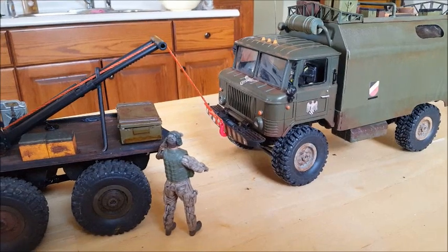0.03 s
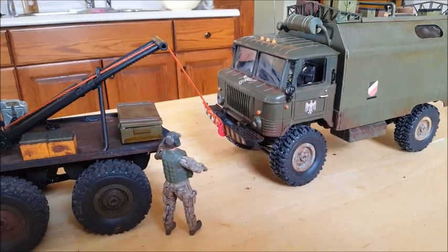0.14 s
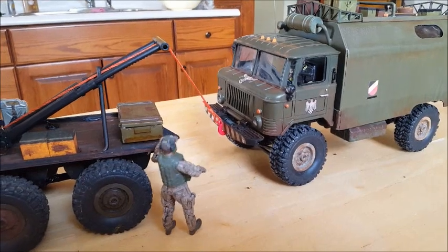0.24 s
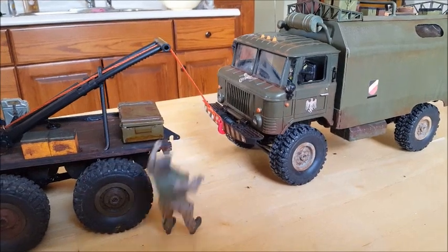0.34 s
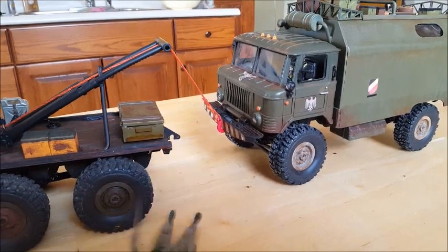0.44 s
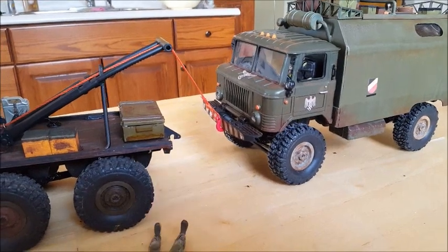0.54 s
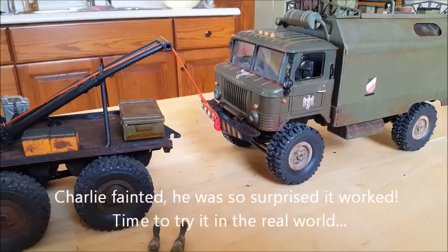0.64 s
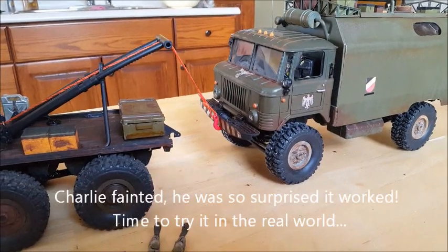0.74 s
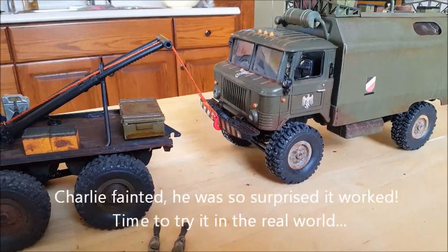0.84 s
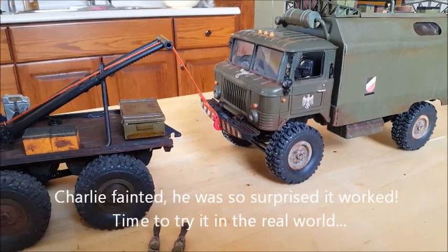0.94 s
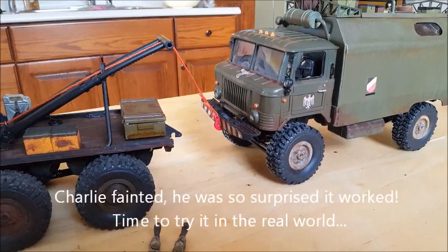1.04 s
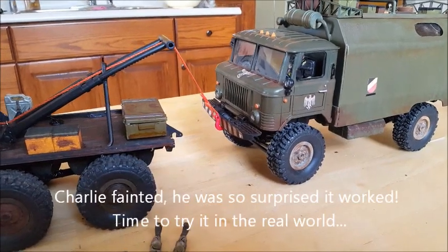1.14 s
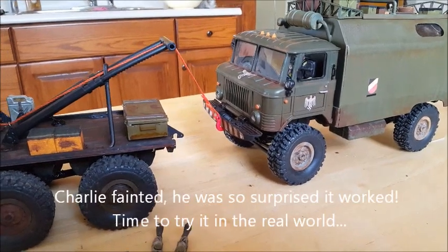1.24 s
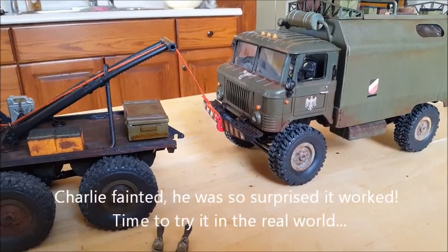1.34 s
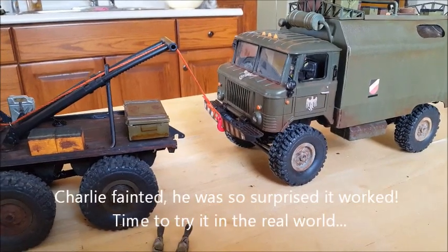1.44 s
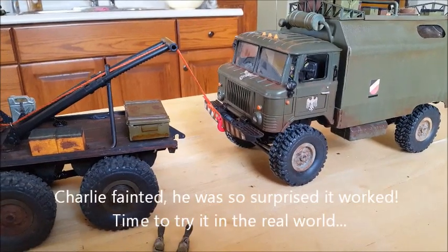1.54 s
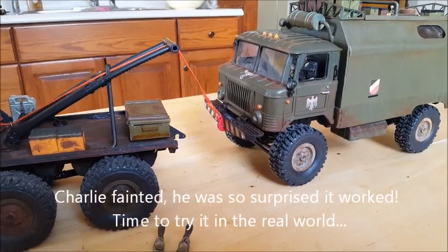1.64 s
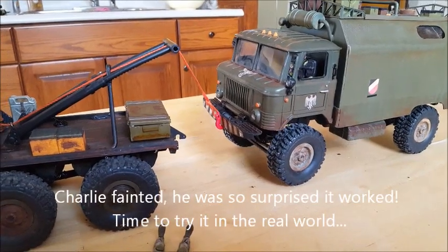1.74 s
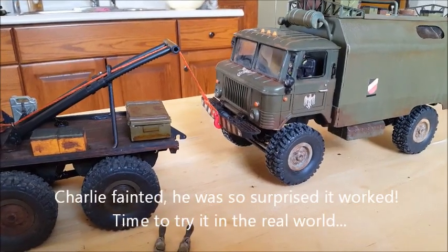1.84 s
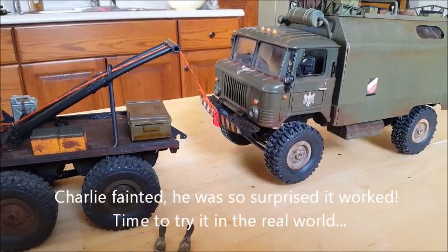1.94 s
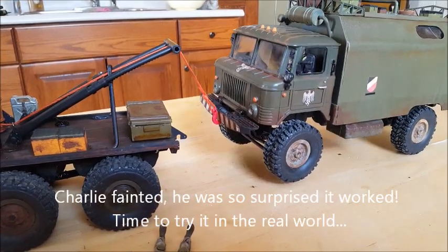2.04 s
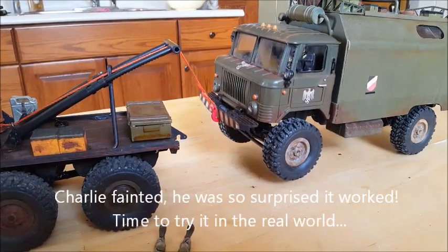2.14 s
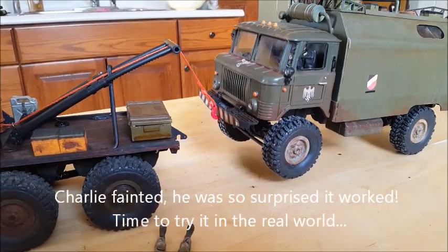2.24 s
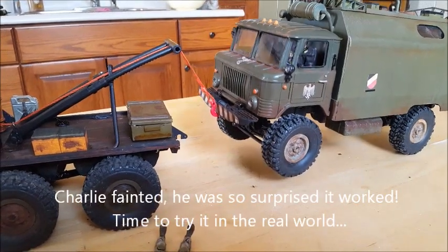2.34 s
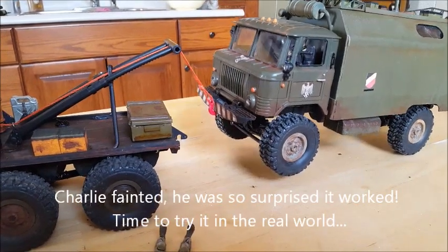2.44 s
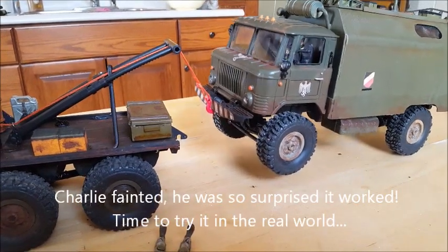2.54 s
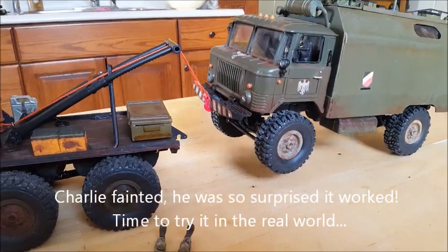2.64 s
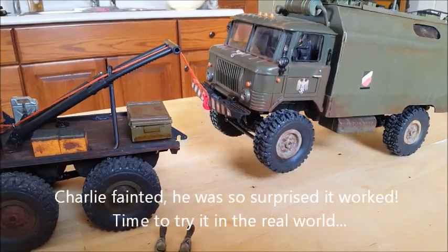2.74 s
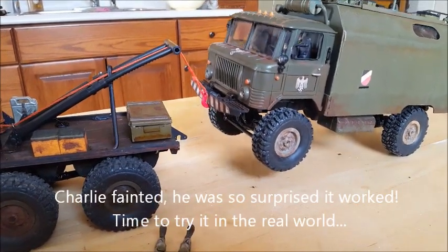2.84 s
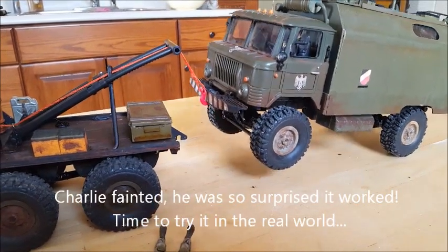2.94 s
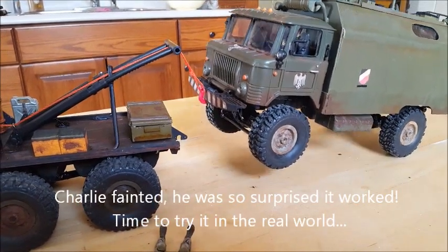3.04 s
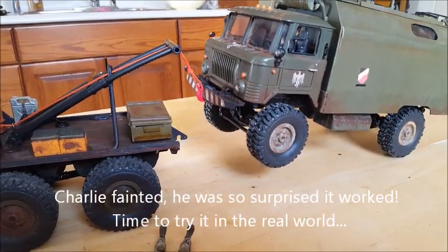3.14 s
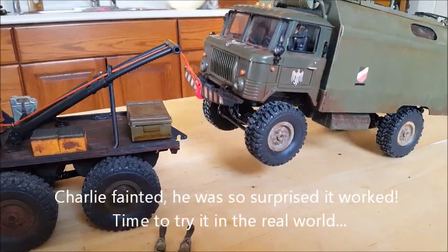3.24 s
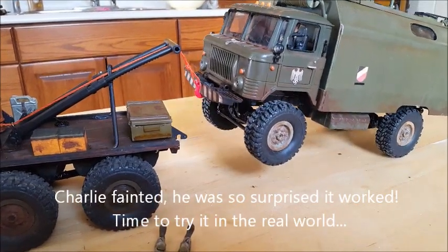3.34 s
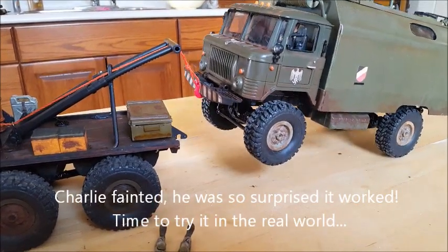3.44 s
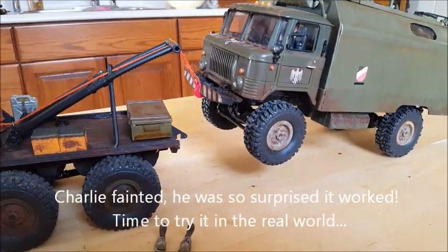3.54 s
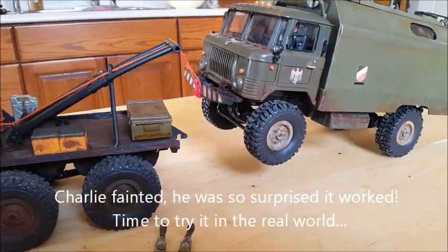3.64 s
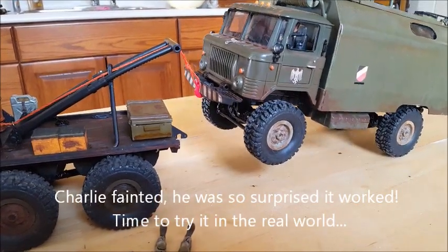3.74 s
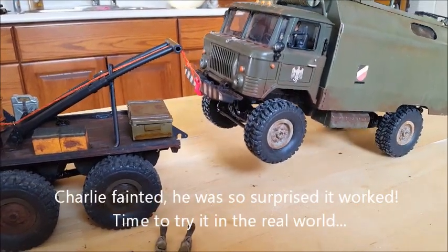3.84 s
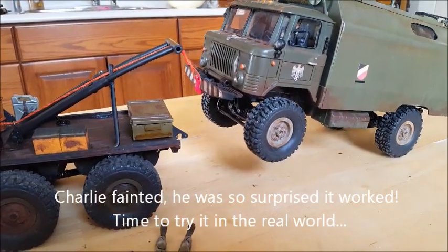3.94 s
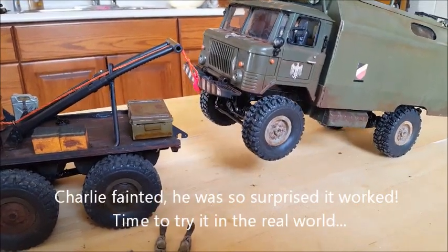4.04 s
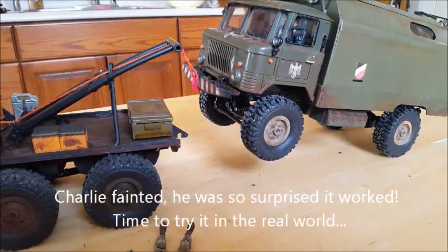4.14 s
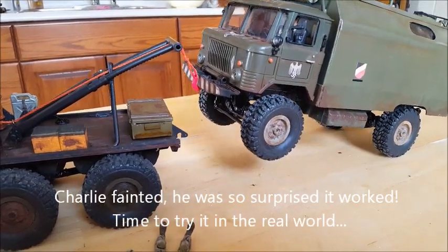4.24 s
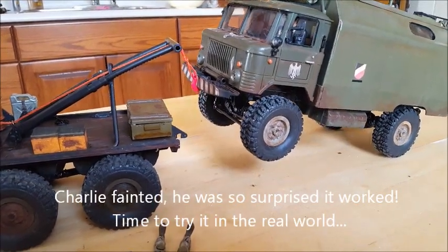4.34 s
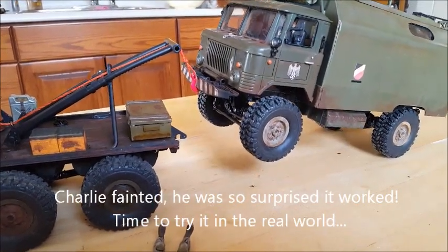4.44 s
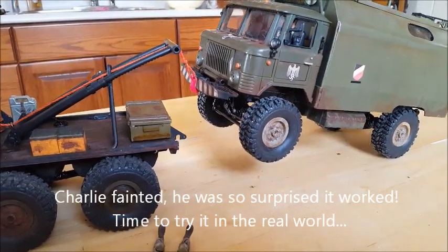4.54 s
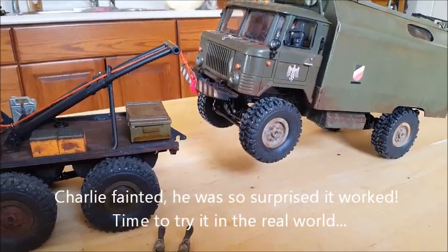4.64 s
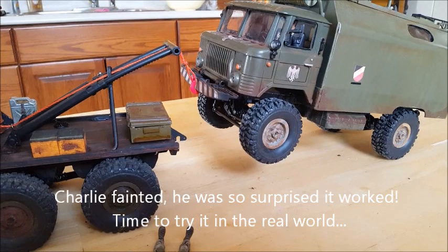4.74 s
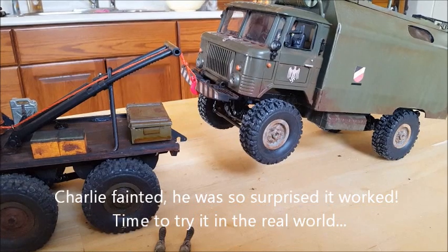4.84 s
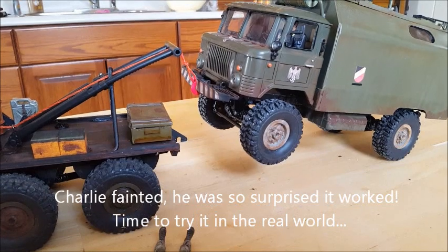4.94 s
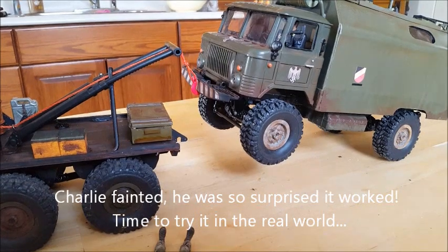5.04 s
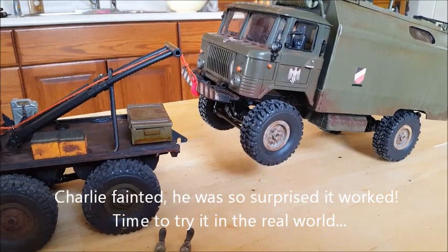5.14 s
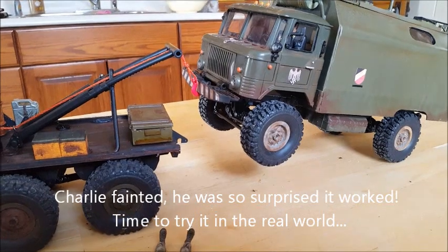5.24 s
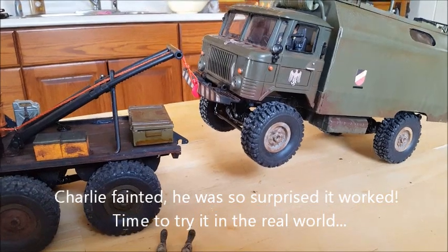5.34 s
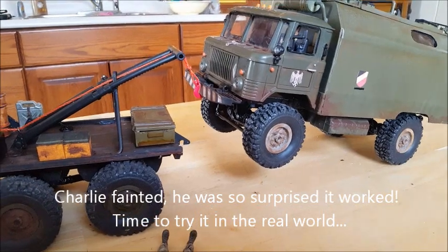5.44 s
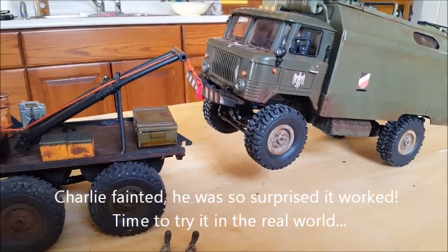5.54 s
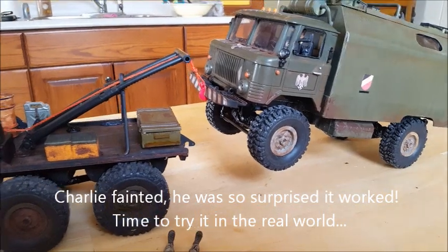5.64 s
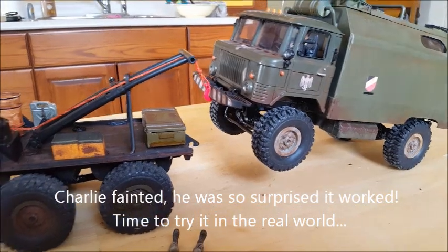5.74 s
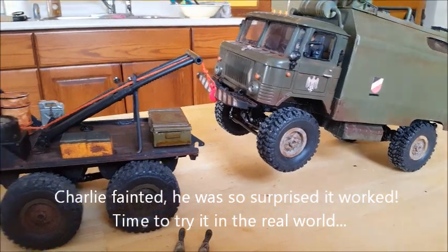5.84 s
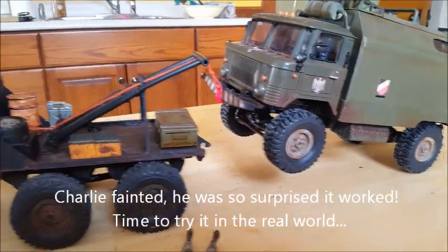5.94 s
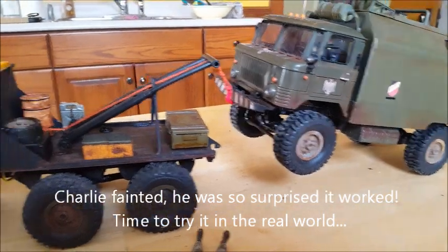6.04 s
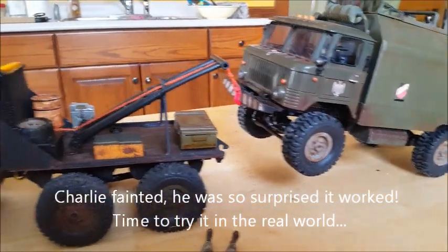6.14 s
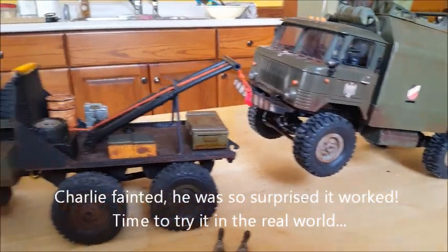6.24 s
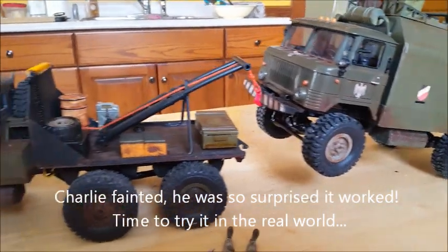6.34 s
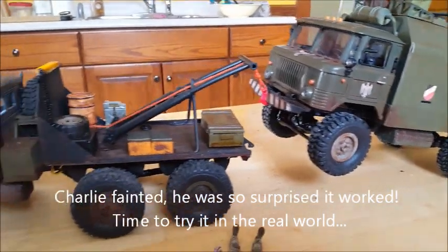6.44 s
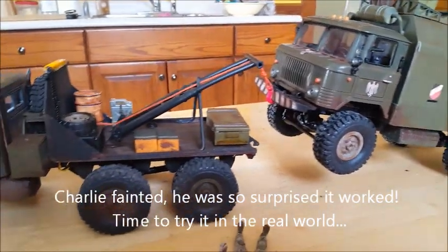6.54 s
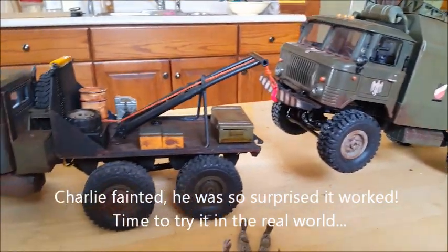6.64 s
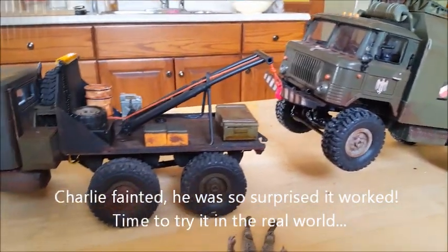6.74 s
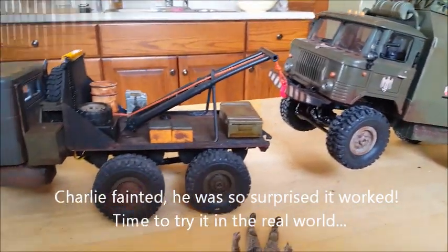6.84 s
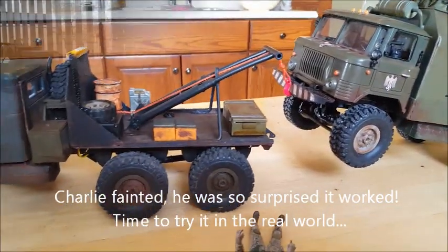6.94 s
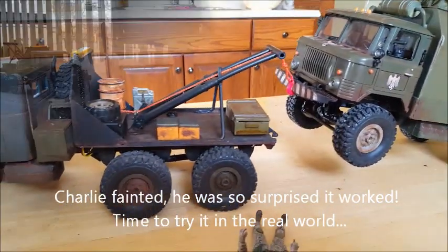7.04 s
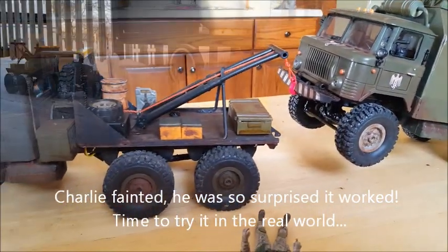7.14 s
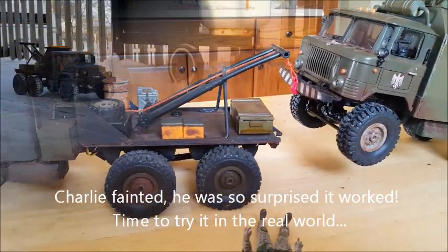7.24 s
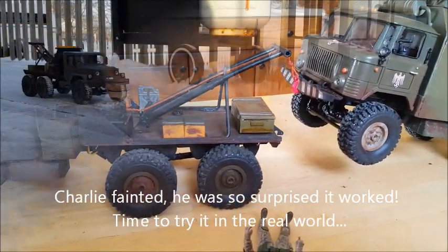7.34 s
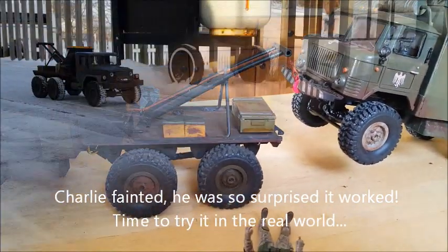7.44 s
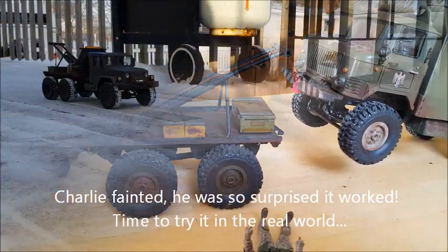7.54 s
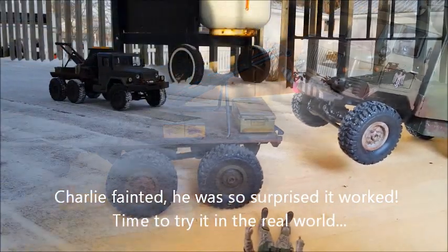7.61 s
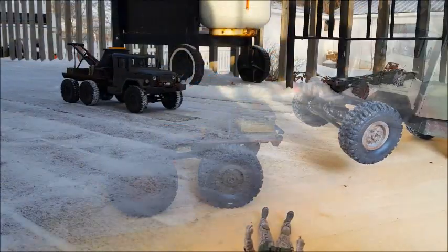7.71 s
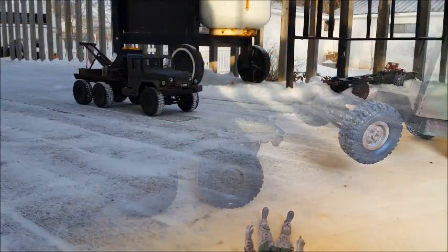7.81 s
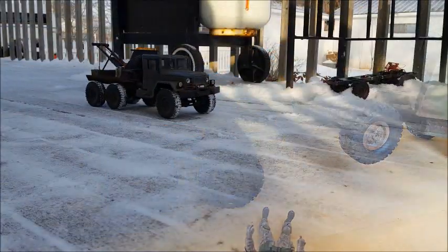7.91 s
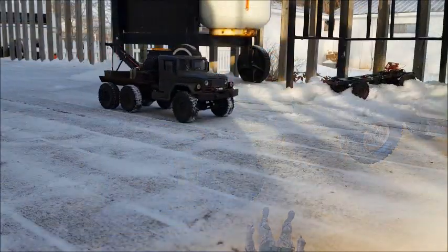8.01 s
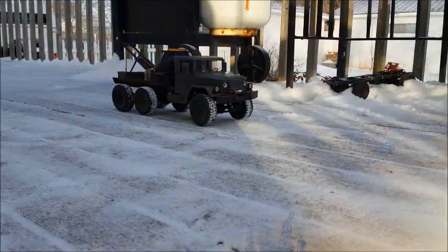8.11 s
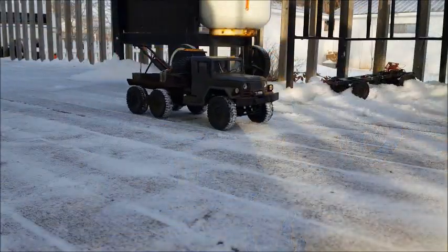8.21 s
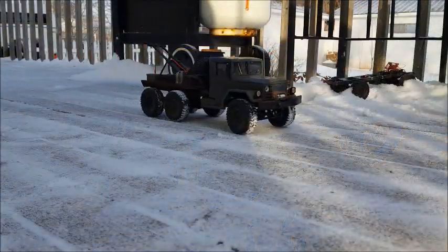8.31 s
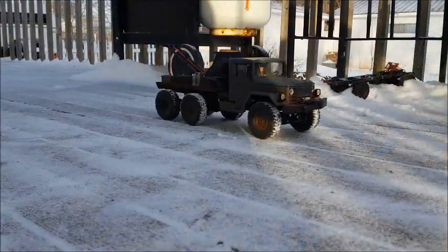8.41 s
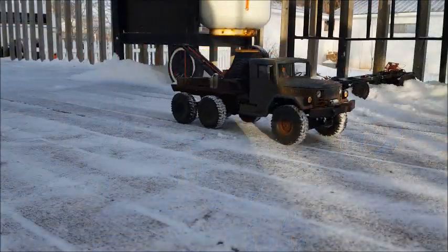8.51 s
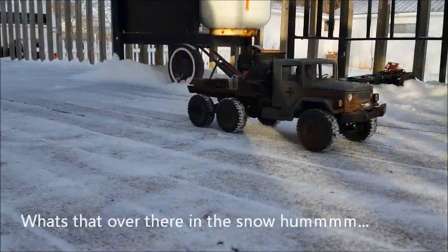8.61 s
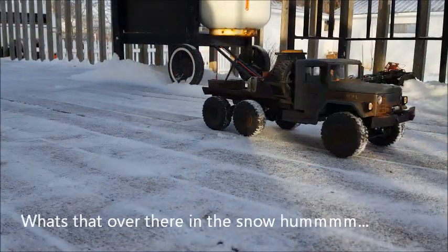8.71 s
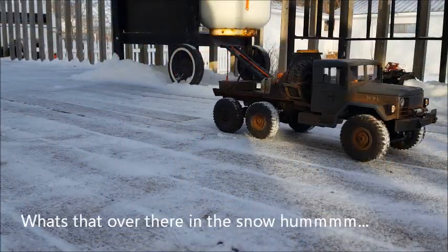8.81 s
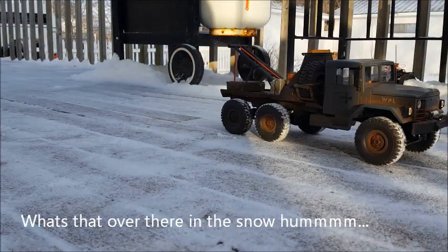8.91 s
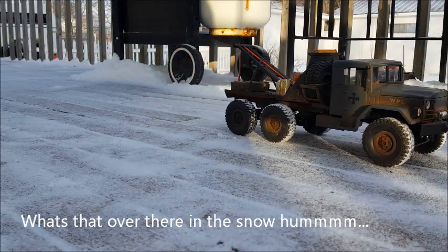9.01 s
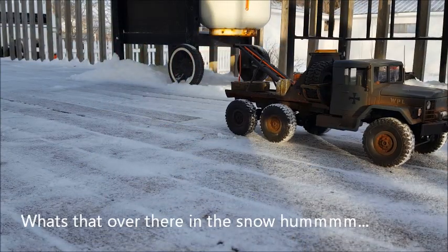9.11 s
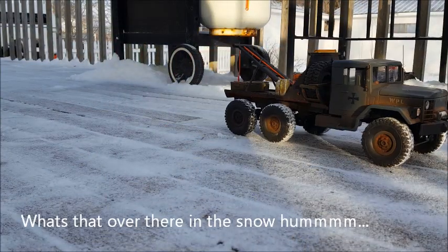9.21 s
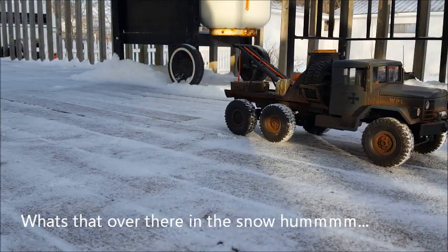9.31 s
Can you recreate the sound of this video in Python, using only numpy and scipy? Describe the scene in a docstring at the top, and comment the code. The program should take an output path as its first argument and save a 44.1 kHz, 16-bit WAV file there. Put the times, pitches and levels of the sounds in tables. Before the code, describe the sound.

In a softly humming kitchen, a toy truck's small winch motor clicks on and whines close by in three bursts, the middle one longest, its pitch sagging under load. During the first, a plastic figure falls and clatters loudly on a wooden table. The sound then cuts outdoors, where the truck drives nearer with whirring gears and a thin electronic tone, tyres crunching snow over a steady rush of air, and slows.

```python
"""A toy truck's geared winch motor whines in three bursts, switched with clicks, in a humming kitchen.
Tooth-mesh harmonics sweep through gearbox resonances as the load slows it; brushes buzz, teeth rattle.
During the first burst a plastic figure topples and rings the wooden table.
Then the scene cuts outdoors: the truck drives past with whirring gears and a singing speed controller,
its tyres crushing crusted snow over the rush of the open air."""
import sys
import numpy as np
from scipy import signal
from scipy.fft import rfft, irfft, next_fast_len
from scipy.io import wavfile

SR = 44100
rng = np.random.default_rng(int(sys.argv[2]) if len(sys.argv) > 2 else 0)


def log_audio(samples):
    """Write samples as a 16-bit WAV file to the path given in sys.argv[1]."""
    # one column per channel
    frames = np.atleast_2d(samples).T
    # limit to full scale, then quantise
    limited = np.clip(frames, -1, 1)
    pcm = np.round(limited * 32767).astype(np.int16)
    wavfile.write(sys.argv[1], SR, pcm)


N = 413216
T = np.arange(N) / SR

# Winch runs. Each row: on and off in seconds, whine gain in dB, brush level in dB.
WINCH_PULLS = [(0.055, 0.719, 0.5, -43), (1.655, 3.439, -1.5, -43), (3.888, 4.191, -2, -44.5)]
# Winch speed, sagging under the truck's weight. Each row: time in seconds, mesh rate in Hz.
WINCH_MESH_HZ = [(0.17, 1929), (0.38, 1860), (0.44, 1789), (0.565, 1752), (0.72, 1626), (1.81, 1599),
                 (1.89, 1645), (2.1, 1637), (2.27, 1581), (2.42, 1590), (2.5, 1629), (2.68, 1587),
                 (2.8, 1629), (2.92, 1554), (3.27, 1512), (3.42, 1573), (4.02, 1544), (4.17, 1453)]
# Winch whine. Each row: mesh multiple, gain in dB, further gain in dB while the cable is slack.
WINCH_HARMONICS = [(1, -1.5, -1), (2, 0, -1.5), (3, -0.5, -11.5), (4, 1, -12), (5, 1, -13), (6, -5, -12)]
# Gearbox resonances. Each row: centre in Hz, width in Hz, peak level in dB.
HOUSING_MODES = [(1780, 300, -47.5), (3203, 220, -42.5), (3650, 280, -38.5), (4888, 196, -30),
                 (5390, 210, -37), (6000, 380, -41), (7140, 178, -51.5), (8183, 234, -41),
                 (8790, 120, -46.5), (9800, 220, -36.5)]
# Brush buzz, gear rattles, chassis rumble. Each row: frequency in Hz, relative density in dB.
BRUSH_SPECTRUM = [(6000, -34), (10500, -13), (11700, -9), (12500, -5), (13400, -2), (14400, -16),
                  (14900, -16), (16000, -18)]
SLACK_SPECTRUM = [(700, -21), (2400, -17), (3000, 2.5), (3650, 5.5), (4300, 5), (5600, -7), (7000, 2.5),
                  (8200, 7.5), (9300, -12), (9800, 2.5), (10800, -7), (16000, -22)]
TAUT_SPECTRUM = [(700, -10.5), (2300, -6.5), (3200, 4), (4100, -6.5), (5200, 11.5), (6200, -3),
                 (7200, -1.5), (8300, 0.5), (10400, -21), (16000, -11)]
RUMBLE_SPECTRUM = [(70, -5), (110, -0.5), (180, -2.5), (290, -5), (470, -7), (700, -15), (1500, -13.5),
                   (2500, -24.5)]
# Stereo balance of winch and figure. Each row: frequency in Hz, left minus right in dB.
WINCH_BALANCE = [(400, 1), (1600, -6), (3200, -2.5), (4800, 3.5), (6400, 6), (8200, -4), (11000, 0.5),
                 (13000, 9), (15500, 9)]
FIGURE_BALANCE = [(60, -1.5), (130, 2), (290, -4), (640, 3), (1410, -4.5), (3100, -2.5), (6820, -3),
                  (15000, 5.5)]
# Switch clicks and plastic knocks. Each row: start in seconds, level in dB, ring in Hz,
# relative snap in dB, relative knock in dB, T60 of ring and snap in seconds.
PLASTIC_CLICKS = [(0.035, -30.5, 2080, 3, -17, 0.021), (0.424, -44, 3200, -2, -22, 0.02),
                  (.83, -43, 2000, -32, -10, 0.031), (.906, -39, 2000, -35, -14.5, 0.015),
                  (1.022, -57, 1990, -26, -20, 0.035), (1.6028, -30.5, 1900, 3, -21.5, 0.013),
                  (4.023, -42, 2300, -18, -30, 0.016), (4.1671, -22, 2530, -8, -20.5, 0.0092),
                  (4.18, -41, 2900, 5.5, -27, 0.04), (4.407, -46.5, 1100, -18, -4, 0.019),
                  (5.15, -64, 2200, -22, -20, 0.21), (6.454, -60, 2070, -5, -24, 0.14)]

# The figure's blows. Each row: start in seconds, table level in dB, clack level in dB.
FIGURE_BLOWS = [(0.5858, -8.5, -18.5), (.594, -17.5, -36), (.619, -25.5, -28.5), (.637, -16.5, -34.5),
                (0.641, -33.5, -18.5), (.675, -35, -26)]
# Table top modes. Each row: frequency in Hz, relative level in dB, T60 in seconds.
TABLE_MODES = [(81, -9, .3), (145, -8, 0.27), (172, -13, 0.44), (197, -6.5, 0.307), (246, -12, 0.27),
               (447, -2.5, 0.22), (488, -11, 0.12), (756, -6.5, 0.23), (902.6, 3.5, 0.15), (1025, -1, 0.14),
               (1158, -0.5, 0.26), (1298, 4.5, 0.13), (1734, -9, .2), (1900, -23, 0.465)]
# Table thud and limb clack. Each row: frequency in Hz, relative density in dB.
THUD_SPECTRUM = [(45, -24), (75, -9.5), (130, -7), (200, -6.5), (300, -12.5), (450, -6.5), (620, -6.5),
                 (900, -7), (1200, -7.5), (1550, -9.5), (2100, -9.5), (3500, -31.5), (6000, -54)]
CLACK_SPECTRUM = [(600, -9), (1200, 5), (2200, -2), (4000, -9), (6500, -18), (12000, -33)]

# The truck nears and slows. Each row: time in seconds, gearbox level in dB, crunch level in dB.
DRIVE_LEVELS_DB = [(6.7, -47, -53), (7.29, -48.5, -49), (8.07, -43.5, -48.5), (8.14, -46.5, -47.5),
                   (8.63, -41, -46), (9.13, -54.5, -57.5), (9.22, -67, -73), (9.35, -62, -70)]
# Drive gear speed. Each row: time in seconds, mesh rate in Hz.
DRIVE_MESH_HZ = [(6.68, 632), (8.0, 648.5), (8.5, 638), (8.88, 591.6), (9.37, 561)]
# Drive whine. Each row: mesh multiple, gain in dB against the gearbox.
DRIVE_PARTIALS = [(1, -14), (2, -13), (3, -7), (4, -11.5)]
# Controller tone at part throttle. Each row: on and off in seconds, gain in dB against the gearbox.
CONTROLLER_SPANS = [(6.763, 7.14, -5.5), (7.465, 8.796, -7.5)]
# Gear chatter, fine and coarse snow. Each row: frequency in Hz, relative density in dB.
CHATTER_SPECTRUM = [(330, -12.5), (430, 0), (580, -12.5), (1000, -6.5), (1300, 0.5), (1700, -3),
                    (1950, -2.5), (2250, -5.5), (2650, -4.5), (2950, -12), (4000, -17.5)]
FINE_SNOW_SPECTRUM = [(1500, -28), (3000, -1), (3700, -16), (4500, -1), (4950, 2), (5500, 2.5), (5900, 3),
                      (6300, 4), (7000, -5), (7550, 0), (8400, -4), (10500, -11), (12800, -8), (16000, -14)]
COARSE_SNOW_SPECTRUM = [(1500, -15), (3000, -3.5), (3650, -2), (4300, 4), (4900, -3.5), (5450, 3),
                        (6400, -2), (7100, -5), (8600, -2.5), (10500, -14.5), (12800, -8.5), (16000, -13)]
# Snow under the tyres. Each row: time in seconds, power share of coarse snow.
COARSE_SHARE = [(6.68, 0.8), (7.3, .18), (7.85, .05), (8.3, 1)]
# Cracks of the crust. Each row: start in seconds, level in dB.
CRUST_CRACKS = [(8.62, -36), (8.655, -37), (8.787, -35.5), (8.819, -43), (8.866, -44), (8.875, -40)]

# Outdoor rush, hollow drone, kitchen air. Each row: frequency in Hz, relative density in dB.
RUSH_SPECTRUM = [(25, -5), (60, 0), (100, 3), (160, -1), (290, -7.5), (420, -5), (780, -4), (1100, -8.5),
                 (1600, -15), (4000, -26)]
DRONE_SPECTRUM = [(600, -27), (700, -5), (752, -1), (800, -10), (920, -12.5)]
ROOM_AIR_SPECTRUM = [(22, -15.5), (50, -11), (90, -4), (190, -5), (300, -8.5), (420, -11.5), (600, -15.5),
                     (1400, -18.5), (2600, -23.5), (5000, -34), (9000, -39), (16000, -38.5)]
# Stereo coherence outdoors and indoors. Each row: frequency in Hz, left-right correlation.
OUTDOOR_COHERENCE = [(60, 0.12), (150, 0.79), (380, 0.83), (950, 0.15), (2380, 0), (5980, 0.04),
                     (15000, 0.0)]
ROOM_COHERENCE = [(30, 0.567), (90, 0.87), (250, 0.56), (700, 0.65), (1500, 0), (16000, 0.015)]
# Appliance hum. Each row: frequency in Hz, rms level in dB.
HUM_PARTIALS = [(92.4, -58), (146, -75.5), (184.8, -57.5), (242, -68.5), (370, -70), (1362, -78.5),
                (2724, -84)]
# Kitchen reverberation. Each row: frequency in Hz, T60 in seconds.
KITCHEN_T60_S = [(100, 0.38), (500, 0.45), (2000, 0.33), (5000, 0.31), (9000, 0.26), (15000, 0.13)]


def winch(fizz_db=-79.5, fizz_stop_s=4.87, fizz_rate_hz=46):
    """Three pulls over a faint pulsing fizz from the powered winch."""
    pulsing = np.exp(.8 * np.cos(2 * np.pi * fizz_rate_hz * T))
    out = from_db(fizz_db) * (T < fizz_stop_s) * colour(rng.standard_normal(N) * pulsing, BRUSH_SPECTRUM)
    for on_s, off_s, whine_db, brush_db in WINCH_PULLS:
        add(out, on_s, winch_pull(on_s, off_s, whine_db, brush_db))
    return from_left(out, WINCH_BALANCE, lead_s=.0003302)


def winch_pull(on_s, off_s, whine_db, brush_db, teeth=10, spin_up_s=.085, taut_at_s=.4):
    """The motor spins up, its whine still weak and its teeth rasping; at switch-off the whine dies first."""
    t = np.arange(on_s, off_s, 1 / SR)
    running_hz, = in_time(WINCH_MESH_HZ, t)
    taut = ramp(t, taut_at_s, length_s=.038)
    starting = 1 - ramp(t, on_s, spin_up_s)
    mesh_hz = running_hz * (1 - .28 * starting) * (1 + .003 * drift(45.1, len(t)))
    shaft_rad = 2 * np.pi * np.cumsum(mesh_hz / teeth) / SR
    whine = from_db(whine_db - 7 * starting) * gear_whine(shaft_rad, teeth, mesh_hz, taut)
    whine *= ramp(t, off_s, length_s=-.028)
    rumble = chassis_rumble(shaft_rad, running_hz)
    buzz = from_db(brush_db) * brush_buzz(shaft_rad)
    rattle = from_db(3 * starting) * gear_rattle(shaft_rad, taut)
    power = ramp(t, on_s, length_s=.03) * ramp(t, off_s, length_s=-.0086)
    return (whine + rumble + buzz + rattle) * power


def gear_whine(shaft_rad, teeth, mesh_hz, taut, play_rad=.1, wobble_rad=.066, swell_db=1.6):
    """Mesh harmonics, smeared by tooth play and an off-centre pinion, swell at the housing's modes."""
    size = len(shaft_rad)
    mesh_rad = teeth * shaft_rad + play_rad * drift(330, size) + wobble_rad * np.sin(shaft_rad)
    whine = 0
    for k, db, slack_db in WINCH_HARMONICS:
        gain = housing_gain(k * mesh_hz) * from_db(db + slack_db * (1 - taut) + swell_db * drift(50.1, size))
        sway = 1 - .33 * np.sin(shaft_rad + 1) + .3 * drift(300, size)
        whine += gain * sway * np.sqrt(2) * np.sin(k * mesh_rad)
    return whine


def housing_gain(hz, skirt=1.12):
    """Gearbox resonances, added in power."""
    return np.sqrt(sum(from_db(db) ** 2 / (1 + (2 * (hz - centre_hz) / width_hz) ** 2) ** skirt
                       for centre_hz, width_hz, db in HOUSING_MODES))


def brush_buzz(shaft_rad, scratch_db=4, spark_depth=.15):
    """Two brushes spark and cross the same scratches every half turn."""
    surface = rms_one(irfft(np.exp(2j * np.pi * rng.random(60)), 2048))
    scratches = np.interp(shaft_rad, np.linspace(0, np.pi, len(surface)), surface, period=np.pi)
    sparks = np.exp(spark_depth * (np.cos(shaft_rad) + np.cos(2 * shaft_rad)) / 2)
    contact = rng.standard_normal(len(shaft_rad)) + from_db(scratch_db) * scratches
    return colour(contact * sparks, BRUSH_SPECTRUM)


def gear_rattle(shaft_rad, taut, slack_db=-39.5, taut_db=-47):
    """Teeth rattle loosely until the cable pulls them together."""
    noise = rng.standard_normal(len(shaft_rad)) * np.exp(.27 * np.cos(shaft_rad))
    loose = from_db(slack_db) * colour(noise, SLACK_SPECTRUM)
    tight = from_db(taut_db) * colour(noise, TAUT_SPECTRUM)
    return (1 - taut) * loose + taut * tight


def chassis_rumble(shaft_rad, running_hz, light_load_hz=1600, full_load_hz=1512):
    """Unequal teeth thrum at shaft harmonics and the chassis rumbles; both grow with load."""
    load = np.clip((light_load_hz - running_hz) / (light_load_hz - full_load_hz), 0, 1)
    thrum = rms_one(sum(np.sin(k * shaft_rad + 2 * np.pi * rng.random()) for k in range(2, 20)))
    rumble = colour(rng.standard_normal(len(shaft_rad)), RUMBLE_SPECTRUM)
    return from_db(-64.5 + 9 * load) * thrum + from_db(-58 + 3 * load) * rumble


def plastic_clicks(ring_db=-5, ping_t60_s=.0082):
    """Small parts strike: a ping in a broad ring, a bright snap, a low knock through the chassis."""
    out, t = np.zeros((2, N)), T[:SR // 10]
    for start_s, db, hz, snap_db, knock_db, t60_s in PLASTIC_CLICKS:
        ring = burst([(hz / 2, -14), (hz * .8, -9), (hz, 0), (hz * 1.4, -11), (hz * 2, -22)], t60_s)[0]
        snap = burst([(900, -1), (5500, 0), (10000, -14), (16000, 0)], t60_s)
        knock = burst([(110, 1), (400, -6), (1000, -17)], t60_s=.11)[0]
        click = from_db(ring_db) * ring + from_db(snap_db) * snap + from_db(knock_db) * knock
        ping = decay(t, ping_t60_s) * np.sin(2 * np.pi * hz * t)
        add(out, start_s, from_db(db) * click)
        add(out, start_s, from_db(db) * ping)
    return out


def falling_figure(modes_db=-4, thud_db=-3, slap_db=-4, slap_hz=1030, slap_rise_s=.00085):
    """The figure lands flat with a slap, then its limbs clatter; each blow rings the table top."""
    out, t = np.zeros(N), T[:16384]
    hz, db, t60_s = np.transpose(TABLE_MODES)[:, :, None]
    modes = from_db(db) * decay(t, t60_s) * np.sin(2 * np.pi * hz * t)
    modes /= np.sqrt(np.sum(from_db(db) ** 2))
    for start_s, blow_db, clack_db in FIGURE_BLOWS:
        strengths = rng.choice([-1, 1], len(modes)) * from_db(rng.normal(0, .5, len(modes)))
        ring = from_db(modes_db) * (strengths @ modes)
        thud = from_db(thud_db) * burst(THUD_SPECTRUM, t60_s=.081)[0]
        clack = from_db(clack_db) * burst(CLACK_SPECTRUM, t60_s=.041)[0]
        add(out, start_s, from_db(blow_db) * (ring + thud) + clack)
    swell = t / slap_rise_s
    slap = swell * np.exp(1 - swell) * np.sin(2 * np.pi * slap_hz * t)
    add(out, FIGURE_BLOWS[0][0], from_db(slap_db) * slap)
    return from_left(out, FIGURE_BALANCE, lead_s=.00026)


def drive_gears(play_rad=.37, slip_db=3.5, far_db=-7, approach_at_s=7.58, clunk_at_s=8.865):
    """Gears chatter, waver as the wheels grip and slip, and clunk as the throttle is let go."""
    chatter = colour(stereo_noise(OUTDOOR_COHERENCE) * from_db(2.5 * drift(300)), CHATTER_SPECTRUM)
    mesh_hz = in_time(DRIVE_MESH_HZ)[0] * (1 + .012 * drift(14))
    mesh_rad = 2 * np.pi * np.cumsum(mesh_hz) / SR + play_rad * drift(110)
    whine = sum(from_db(db + slip_db * np.array([drift(30), drift(30)])) * np.sin(k * mesh_rad)
                for k, db in DRIVE_PARTIALS)
    whine *= from_db(far_db * (1 - ramp(T, approach_at_s, length_s=.56)))
    gearbox_db, _ = in_time(DRIVE_LEVELS_DB)
    out = from_db(gearbox_db + 2) * (chatter + whine + controller_tone())
    add(out, clunk_at_s, from_db(-34) * burst(CHATTER_SPECTRUM, t60_s=.13))
    return out


def controller_tone(hz=1521, fade_s=.088, flicker_db=3.7):
    """The speed controller sings at part throttle."""
    gate = sum(from_db(db) * ramp(T, on_s, fade_s) * ramp(T, off_s, -fade_s)
               for on_s, off_s, db in CONTROLLER_SPANS)
    return gate * from_db(flicker_db * drift(25)) * np.sin(2 * np.pi * hz * T + .5 * drift(35))


def tyres_on_snow():
    """Tyres crush fine and coarse snow and crack the crust."""
    _, crunch_db = in_time(DRIVE_LEVELS_DB)
    share = np.clip(in_time(COARSE_SHARE)[0], 0, 1)
    fine = np.sqrt(1 - share) * snow_grains(FINE_SNOW_SPECTRUM)
    coarse = np.sqrt(share) * snow_grains(COARSE_SNOW_SPECTRUM)
    out = from_db(crunch_db + 3) * (fine + coarse)
    for start_s, db in CRUST_CRACKS:
        crack = burst([(900, -7), (1900, -3), (3500, 3), (6500, -1), (12000, -30)], t60_s=.034)
        add(out, start_s, from_db(db) * crack)
    return out


def snow_grains(spectrum, grain_db=1.6, clump_db=2.3, band_hz=330):
    """Clumps of grains squeak in narrow bands: three interleaved sets, each flickering on its own."""
    size = next_fast_len(N)
    grit = rfft(stereo_noise(OUTDOOR_COHERENCE) * from_db(grain_db * drift(900)), size)
    band_set = (bins_hz(size) // band_hz) % 3
    clumps = sum(irfft(grit * (band_set == k), size)[:, :N] * from_db(clump_db * drift(45))
                 for k in range(3))
    return colour(clumps, spectrum)


def outdoor_air(rush_db=-45, gust_db=1, drone_db=-51):
    """Open air rushes, with a hollow drone in it."""
    rush = from_db(rush_db + gust_db * drift(20)) * colour(stereo_noise(OUTDOOR_COHERENCE), RUSH_SPECTRUM)
    return rush + from_db(drone_db) * colour(stereo_noise(OUTDOOR_COHERENCE), DRONE_SPECTRUM)


def room_tone(air_db=-58, waver_rad=.25):
    """An appliance hums over soft room air."""
    hum = sum(from_db(db + drift(5)) * np.sqrt(2) * np.sin(2 * np.pi * hz * T + waver_rad * drift(6))
              for hz, db in HUM_PARTIALS)
    return hum + from_db(air_db) * colour(stereo_noise(ROOM_COHERENCE), ROOM_AIR_SPECTRUM)


def kitchen_reverb(x, size=30000, mono_below_hz=420):
    """Diffuse tail of unit energy, dying faster in the treble."""
    t, hz, centres_hz = T[:size], bins_hz(size), np.array(KITCHEN_T60_S)[:, 0]
    noise, tail = rfft(rng.standard_normal((2, size))), 0
    noise[1] = np.where(hz < mono_below_hz, noise[0], noise[1])
    for share, (_, t60_s) in zip(np.eye(len(centres_hz)), KITCHEN_T60_S):
        band = irfft(noise * at_hz(np.c_[centres_hz, share], hz), size)
        tail += band * decay(t, t60_s)
    tail = rms_one(tail * ramp(t, .003, length_s=.0015)) / np.sqrt(size)
    return signal.fftconvolve(x, tail, axes=1)[:, :N]


def from_left(x, balance, lead_s):
    """Sound from the left arrives there first; each side is shaded by frequency."""
    size = next_fast_len(N)
    hz = bins_hz(size)
    shading = from_db(at_hz(balance, hz) * [[.5], [-.5]])
    delay = np.exp(-2j * np.pi * hz * lead_s * [[0], [1]])
    return irfft(rfft(x, size) * shading * delay, size)[:, :N]


def stereo_noise(coherence):
    """White noise with a given left-right correlation."""
    size = next_fast_len(N)
    mid, side = rfft(rng.standard_normal((2, size)))
    alike = np.clip(at_hz(coherence, bins_hz(size)), -1, 1)
    return irfft(np.sqrt(1 + alike) * mid + np.sqrt(1 - alike) * side * [[1], [-1]], size)[:, :N]


def burst(spectrum, t60_s, size=16384):
    """A blow on many close modes: decaying stereo noise."""
    return colour(rng.standard_normal((2, size)), spectrum) * decay(T[:size], t60_s)


def colour(x, spectrum):
    """Filter by (Hz, dB) points, 12 dB per octave down beyond the ends; rms 1."""
    size = next_fast_len(x.shape[-1])
    hz = bins_hz(size)
    skirts = (np.minimum(hz / spectrum[0][0], 1) / np.maximum(hz / spectrum[-1][0], 1)) ** 2
    gain = from_db(at_hz(spectrum, hz)) * skirts
    return rms_one(irfft(rfft(x, size) * gain, size)[..., :x.shape[-1]])


def drift(rate_hz, size=N):
    """Random wander; rms 1."""
    knots = rng.standard_normal(int(size / SR * rate_hz) + 4)
    return rms_one(np.interp(np.arange(size) / SR * rate_hz, np.arange(len(knots)), knots))


def ramp(t, at_s, length_s):
    """Rise from 0 to 1; a negative length falls to 0 at at_s."""
    return np.clip((t - at_s) / length_s, 0, 1)


def add(out, start_s, sound):
    start = max(int(start_s * SR), 0)
    part = sound[..., :N - start]
    out[..., start:start + part.shape[-1]] += part


def in_time(rows, t=T):
    times_s, *columns = np.transpose(rows)
    return [np.interp(t, times_s, column) for column in columns]


def at_hz(points, hz):
    points_hz, values = np.transpose(points)
    return np.interp(np.log(np.maximum(hz, 1)), np.log(points_hz), values)


def bins_hz(size):
    return np.fft.rfftfreq(size, 1 / SR)


def decay(t, t60_s):
    return from_db(-60 * t / t60_s)


def from_db(db):
    return 10 ** (np.asarray(db) / 20)


def rms_one(x):
    return x / np.sqrt(np.mean(x ** 2) + 1e-20)


def scene(winch_db=-1, cut_s=6.665, room_fade_s=(7.2, 8.6)):
    """The kitchen, then a hard cut to the snow; the room tone fades out later."""
    motor = from_db(winch_db) * winch()
    fall = falling_figure()
    clicks = plastic_clicks()
    reverb = kitchen_reverb(from_db(-5) * motor + from_db(-3) * fall + from_db(-2) * clicks)
    room = room_tone() * np.interp(T, room_fade_s, [1, 0])
    outdoors = drive_gears() + outdoor_air() + tyres_on_snow()
    cut = ramp(T, cut_s, length_s=.005)
    return (motor + fall + clicks + reverb) * (1 - cut) + room + outdoors * cut


def record(dry, low_cut_hz=36, ceiling=.92, high_cut_hz=15800):
    """Low cut, peak clip, steep high cut."""
    low_cut = signal.butter(2, low_cut_hz, "high", fs=SR, output="sos")
    high_cut = signal.ellip(10, .1, 80, high_cut_hz, fs=SR, output="sos")
    clipped = np.clip(signal.sosfilt(low_cut, dry), -ceiling, ceiling)
    return signal.sosfilt(high_cut, clipped)


dry = scene()
out = record(dry)
log_audio(out)
```